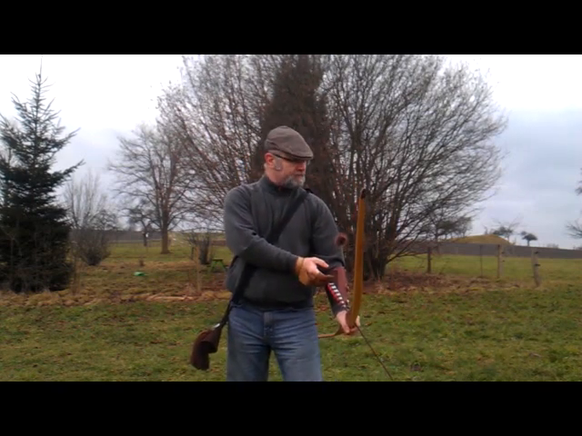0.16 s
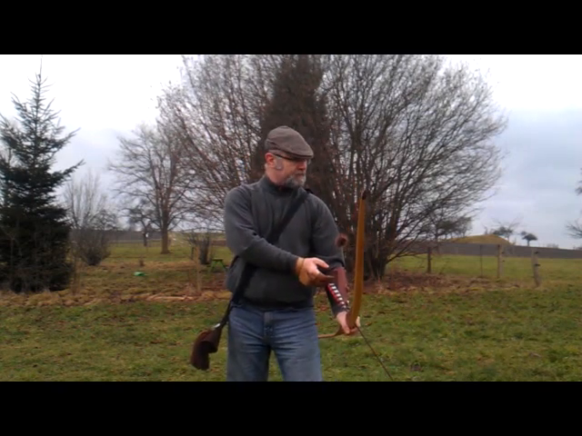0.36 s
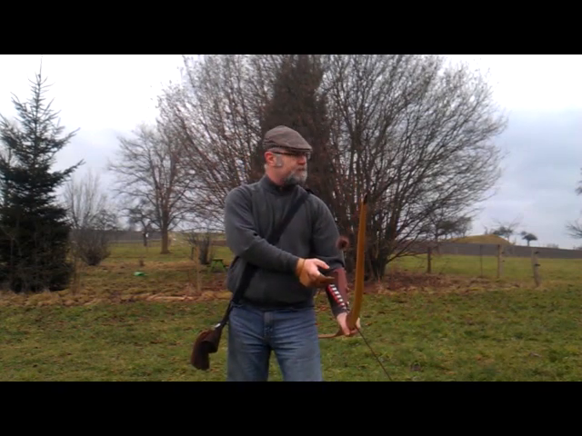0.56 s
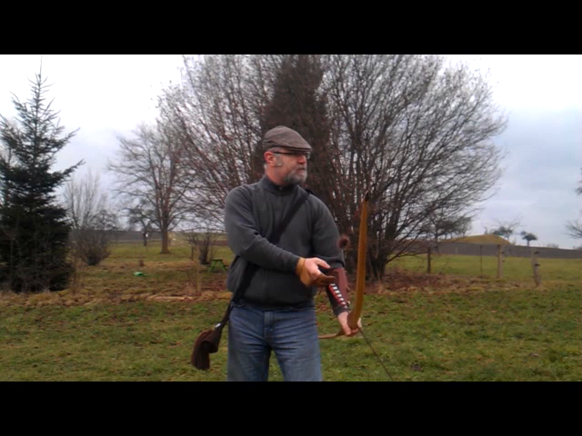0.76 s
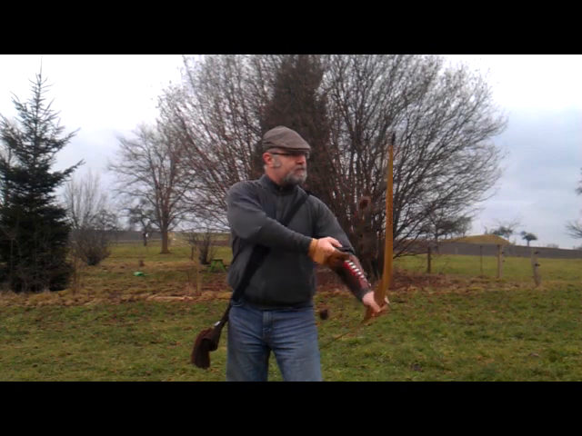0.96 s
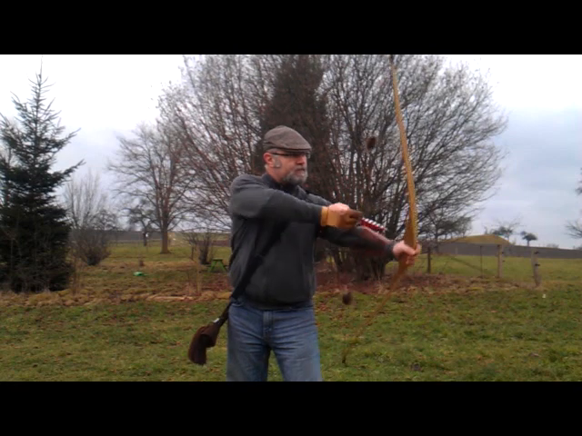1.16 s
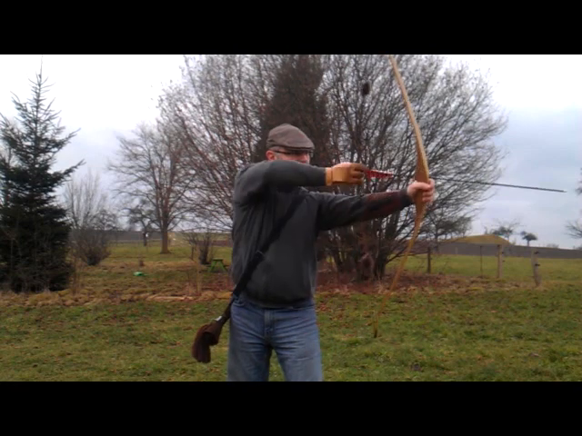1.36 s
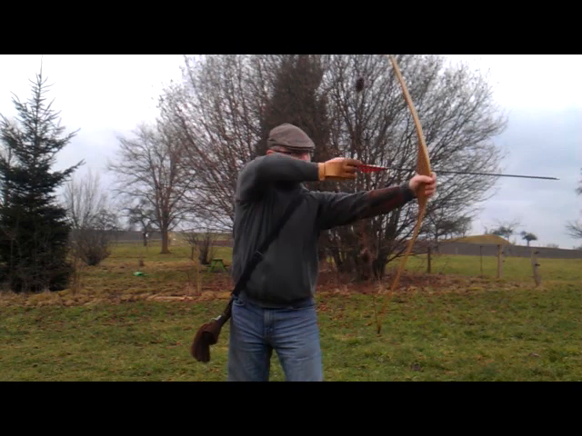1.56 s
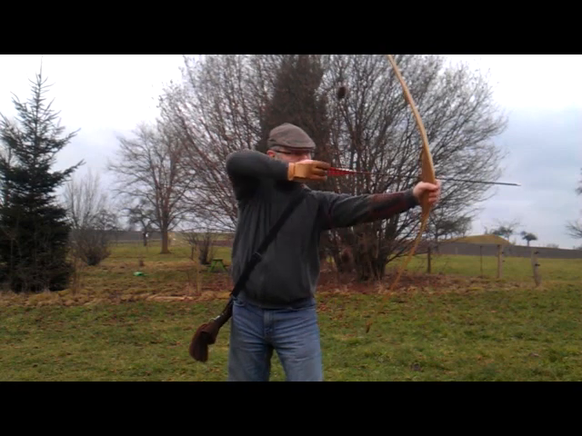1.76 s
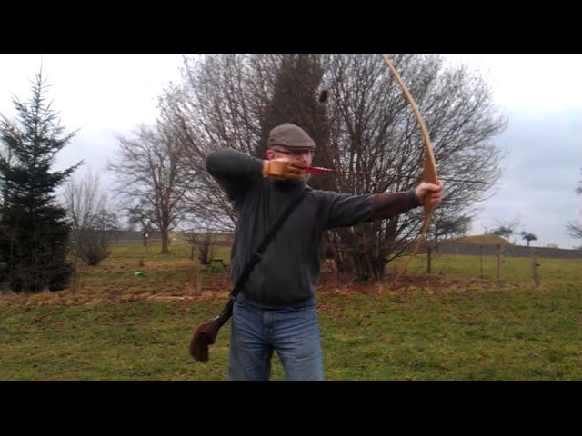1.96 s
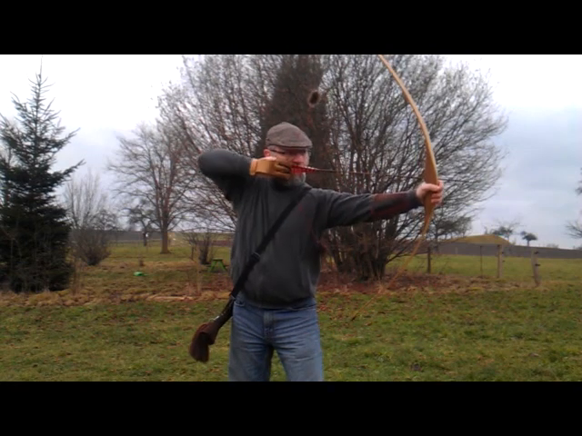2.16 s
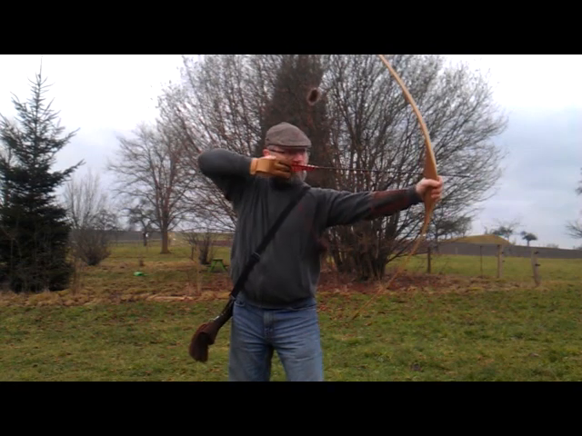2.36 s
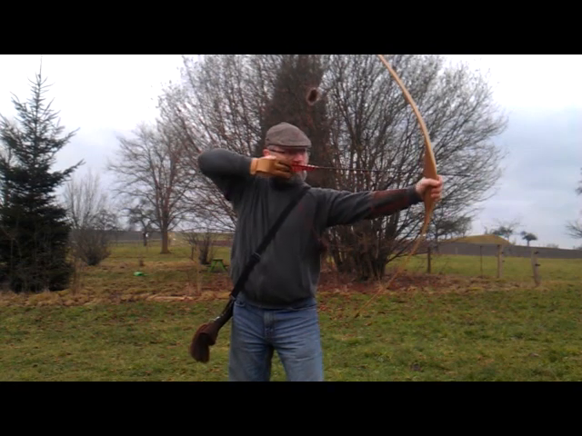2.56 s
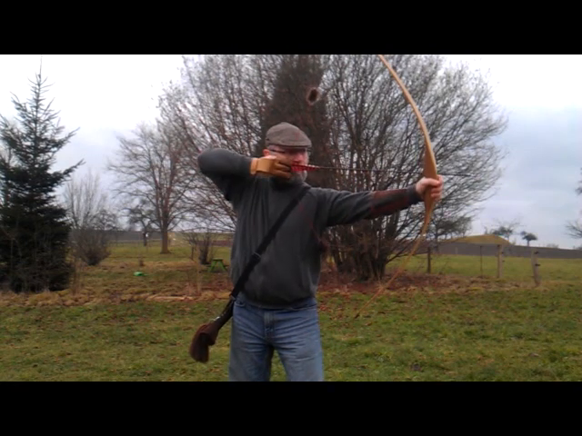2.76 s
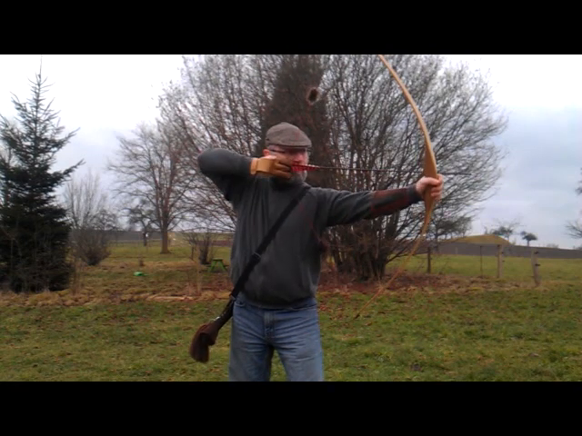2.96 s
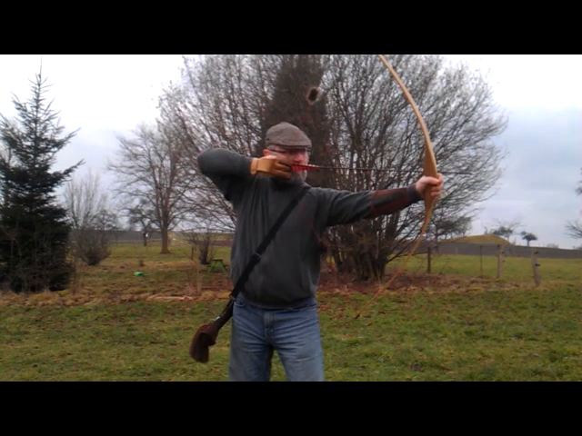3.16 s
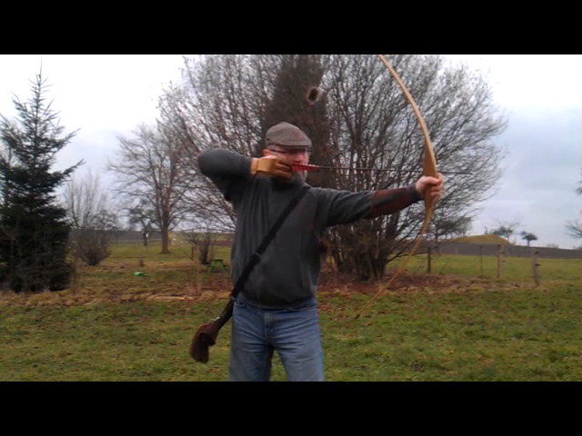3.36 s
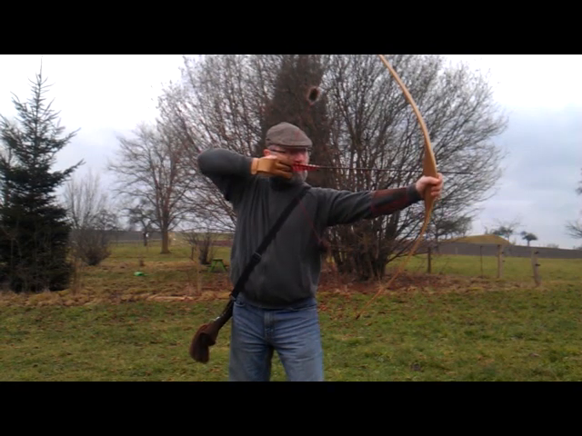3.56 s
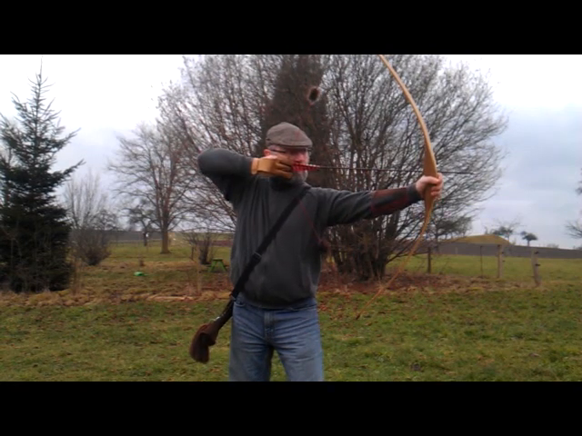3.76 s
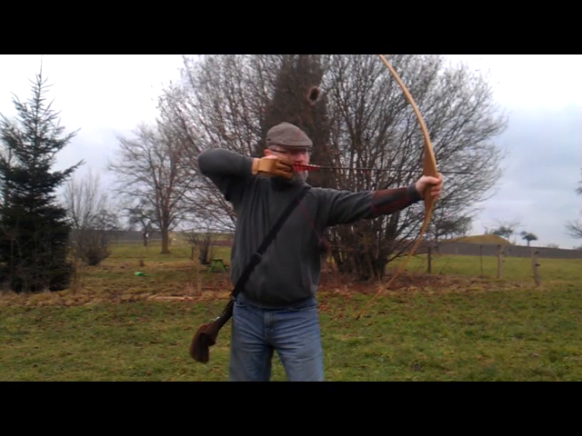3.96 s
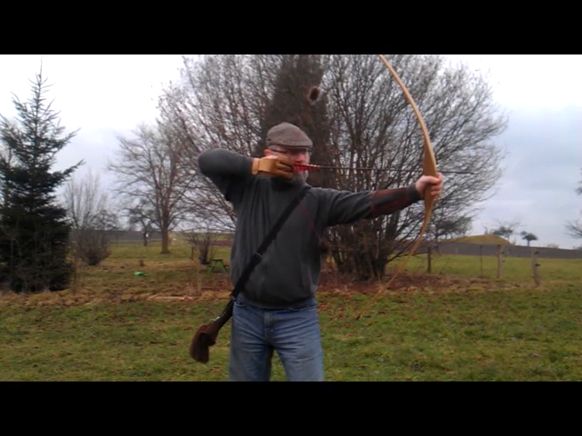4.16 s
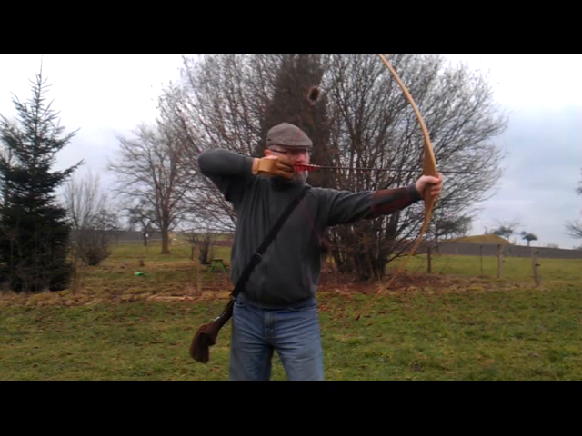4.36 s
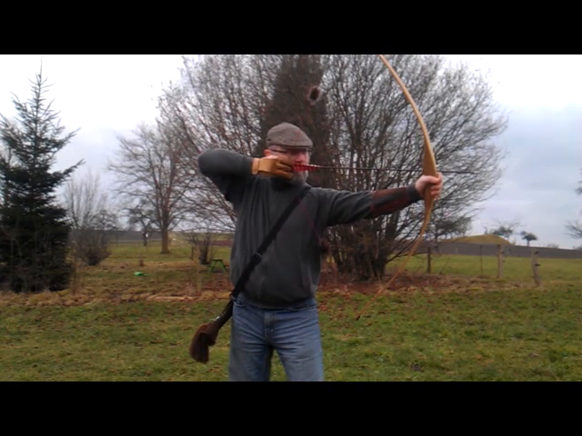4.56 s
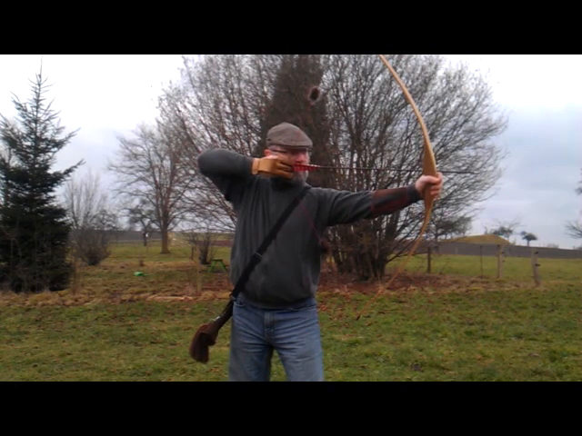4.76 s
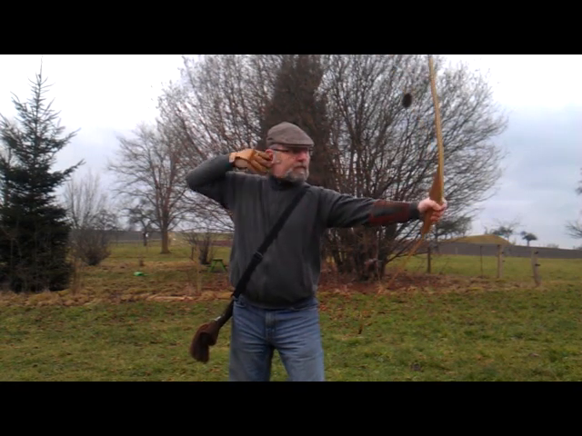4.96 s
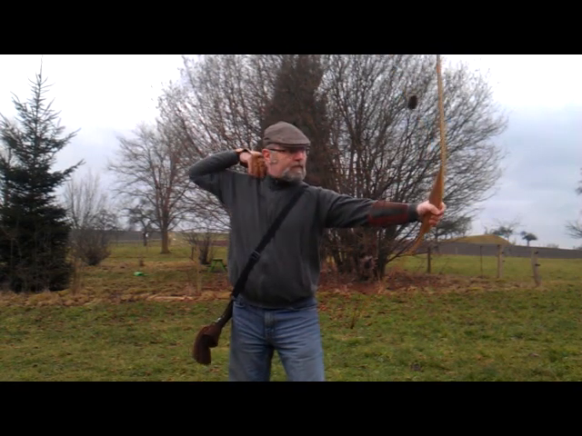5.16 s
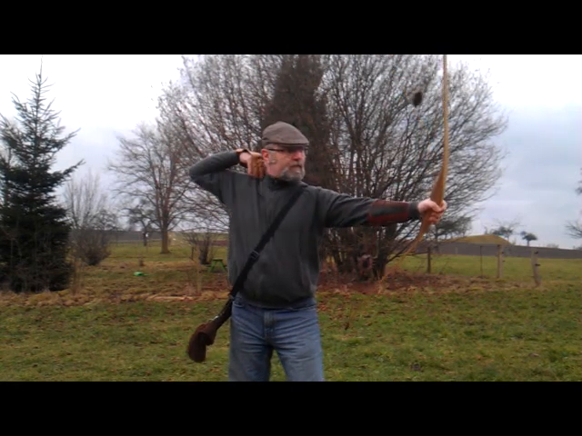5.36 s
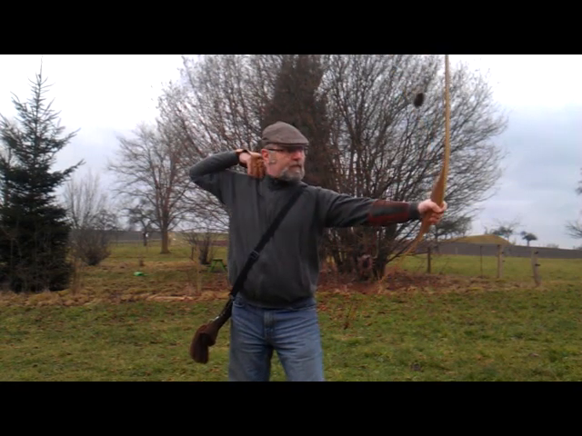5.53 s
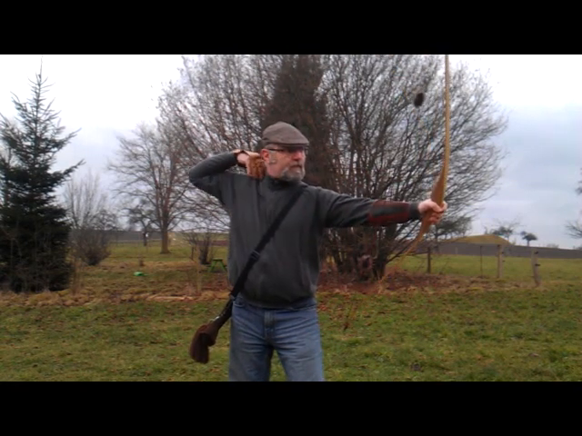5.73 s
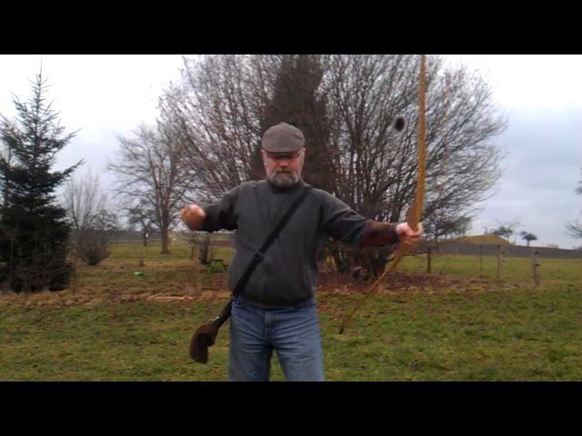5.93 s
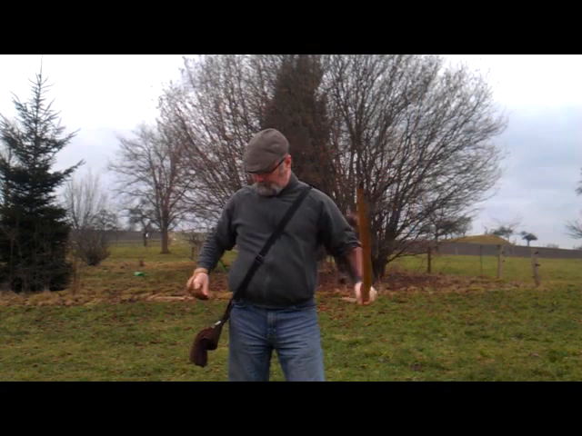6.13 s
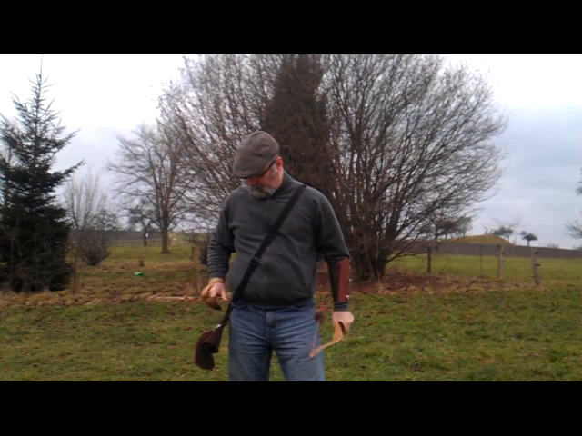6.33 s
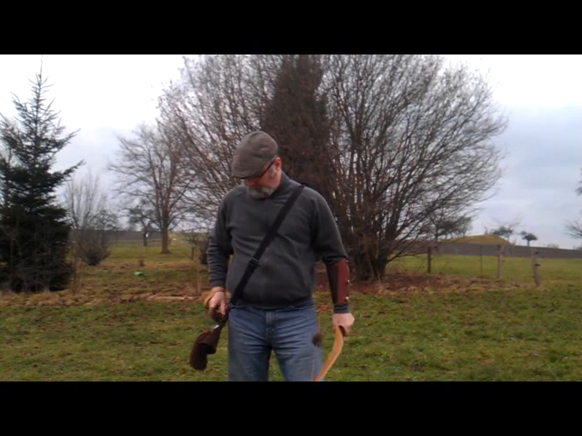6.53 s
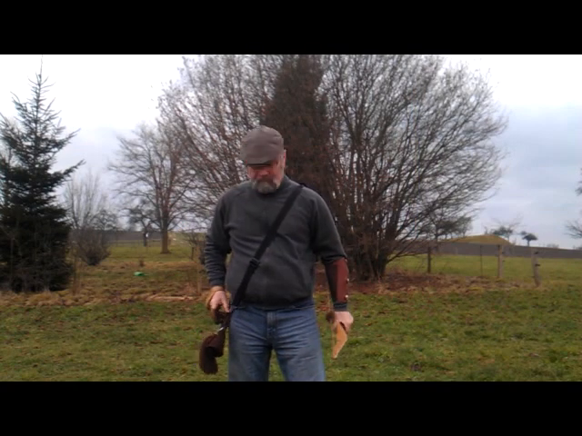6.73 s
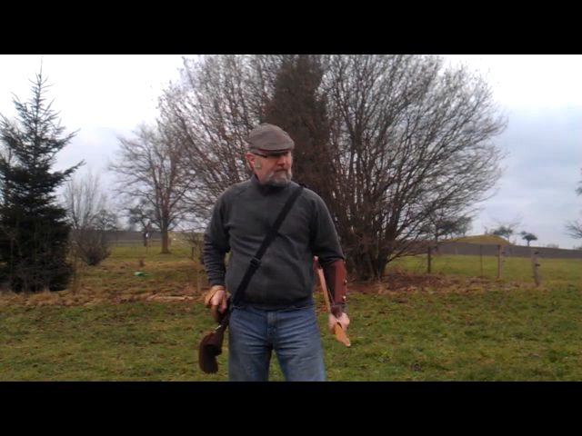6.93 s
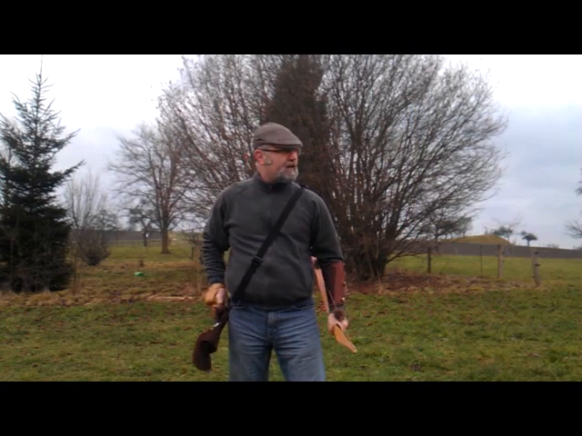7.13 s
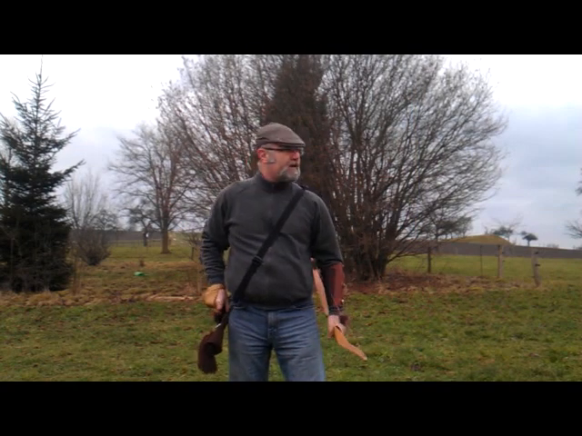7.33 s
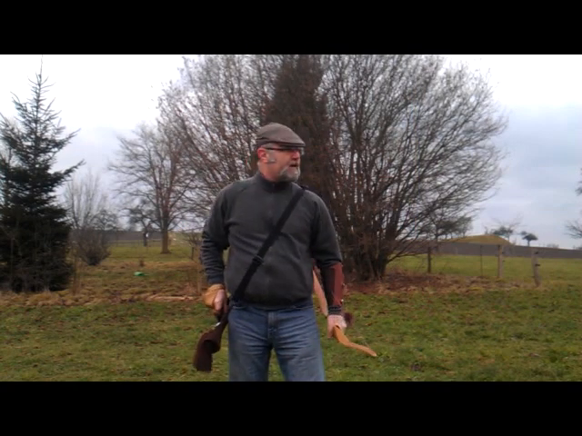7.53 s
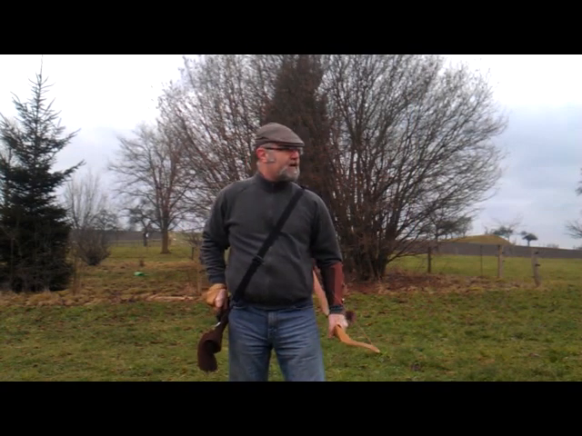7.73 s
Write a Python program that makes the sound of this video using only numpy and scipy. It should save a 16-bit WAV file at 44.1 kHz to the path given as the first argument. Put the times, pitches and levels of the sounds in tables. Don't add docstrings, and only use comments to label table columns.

```python
import sys
import numpy as np
from scipy import signal
from scipy.io import wavfile
from scipy.ndimage import uniform_filter1d

SR = 44100
rng = np.random.default_rng(int(sys.argv[2]) if len(sys.argv) > 2 else 0)


def pcm_store(signal):
    levels = np.round(np.clip(np.atleast_2d(signal), -1, 1) * 32767)
    wavfile.write(sys.argv[1], SR, levels.astype(np.int16).T)


def gain_from_db(level_db):
    decades = np.asarray(level_db, float) / 20
    return 10 ** decades


N = 348257

# [t/s, level/dB, f/Hz]
STRING_ZIP = [(4.8425, -47, 1897), (4.8455, -38, 2500), (4.8478, -23.5, 3050), (4.8503, -21, 3170),
              (4.8512, -39, 3050), (4.8533, -27, 2950), (4.855, -42, 2900)]
# [t/s, wood level/dB, dry crack level/dB, pitch factor of the wood]
STRING_SLAPS = [(4.8362, -36, -42, 1.1), (4.8505, -10, -18, 1.0), (4.8542, -20, -12, 1.05),
                (4.8575, -21, -30, .95), (4.8622, -15, -9.5, .95), (4.8657, -8.5, -32, 1.0),
                (4.8692, -19, -30, .97), (4.8725, -24, -32, .95), (4.8745, -25, -38, .85),
                (4.879, -30, -50, .8), (4.9091, -26, -35, 1.1), (4.9135, -39, -44, 1.1)]
# [f/Hz, level/dB, time to fall 60 dB/s]
LIMB_MODES = [(422, -27.5, 0.042), (605, -22.5, 0.03), (760, -29, 0.03), (810, -20, 0.018),
              (1166, 4.5, 0.0045), (1150, -26, 0.023), (1920, -20, 0.012), (195, -21, 0.043),
              (130, -24, .05)]
# [f/Hz, level/dB, time to fall 60 dB/s]
STAVE_MODES = [(458, -32, 0.066), (542, -31, 0.13), (686, -42, 0.25), (716, -40, 0.07), (775, -43, 0.22),
               (1024, -23, .055), (1166, -21, .04), (265, -28, 0.06)]
# [t/s, level/dB, push or rebound]
POINT_JOLTS = [
    (5.136, -6.5, 1),
    (5.1363, -6.5, 0.93),
    (5.1367, -8, -0.85),
    (5.137, -3, -0.95),
]
# [f/Hz, level/dB, time to fall 60 dB/s]
FACE_MODES = [(2300, -8, 0.0032), (3910, -8, 0.0046), (4800, -8, 0.0064), (7720, -8.5, 0.008),
              (9370, -17, 0.0048), (6150, -18, 0.0046)]
# [t/s, level/dB]
SHAFT_KNOCKS = [
    (5.13595, -5),
    (5.1365, 0),
]
# [f/Hz, level/dB, time to fall 60 dB/s]
KNOCK_MODES = [(1860, -5, 0.0053), (1040, -9.5, 0.0054)]
# [f/Hz, level/dB, time to fall 60 dB/s]
STAND_MODES = [(152, -18.5, .036)]
# [f/Hz, level/dB, time to fall 60 dB/s]
STRAW_MODES = [(236, -21, 0.027), (335, -26, 0.045), (440, -20, 0.022), (570, -25, .032), (720, -36, 0.03)]
# [t/s, level/dB, time to fall 60 dB/s, lowest
# f/Hz, highest f/Hz]
HISSES = [(4.8375, -36.5, 0.18, 900, 11000), (4.836, -41, .05, 200, 1400), (7.0645, -51, .012, 900, 4500),
          (4.8508, -20.5, 0.033, 4900, 13000), (4.8543, -25.5, 0.08, 5800, 9100),
          (4.867, -33.5, 0.036, 3960, 9600), (4.881, -56, 0.5, 6600, 8900), (4.853, -26, 0.081, 252, 1500),
          (4.853, -31, .075, 1500, 5500), (5.1367, -16.5, 0.013, 840, 9300), (5.14, -38, 0.05, 2300, 6000),
          (5.14, -36, .06, 6300, 9500), (5.1475, -36, .03, 6500, 7800), (5.165, -53, .04, 6600, 7600),
          (5.148, -42, 0.038, 1200, 9400), (5.216, -60, .15, 1450, 2300)]
# [delay t/s, level/dB, time to fall 60 dB/s]
TREE_ECHOES = [
    (.003, -68, 0.084),
    (.066, -57, 0.5),
    (.145, -62, .2),
    (.2, -65, 0.57),
]

# [t/s, level/dB, swell/s, fade/s]
SLEEVE_RUSTLES = [
    (.05, -53.5, 0.14, 0.18),
    (.982, -61, .095, 0.036),
    (6.068, -66.5, 0.49, 0.24),
    (7.438, -59, 0.22, 0.057),
]
# [f/Hz, level/dB per Hz]
CLOTH_COLOUR = [(880, -46), (1500, -5.5), (2670, -7.5), (4480, 0), (8810, -5), (12400, -16), (13000, -34)]
# [t/s, level/dB]
DRAW_LEVEL = [
    (1.45, -89),
    (1.584, -55.5),
    (2.086, -54),
    (2.2, -75),
]
# [f/Hz, level/dB per Hz]
SHAFT_COLOUR = [(1180, -44), (2000, -12), (2430, -13), (4920, -4), (5280, -9), (5800, -5.5), (7750, 0.5),
                (11900, -19), (12700, -23), (13000, -38)]
# [t/s, level/dB, lowest f/Hz, highest f/Hz]
GEAR_TICKS = [(5.2833, -41, 4200, 7400), (7.0645, -47, 6300, 8450), (7.234, -46.5, 6300, 8450),
              (7.4084, -55, 6300, 8450), (7.416, -40, 6300, 8450), (7.4322, -33, 6300, 9500),
              (7.444, -41, 6800, 9500), (7.5463, -43, 6300, 8450), (1.712, -48, 3000, 9000),
              (5.2075, -53, 3600, 8000), (5.2122, -48, 3800, 4800), (5.229, -47, 6200, 8500),
              (5.214, -48, 6300, 7400), (5.264, -49, 5500, 8500)]

# [t into the call/s, f/Hz, level/dB]
CHIRRUP_PATH = [(0, 3900, 3), (.006, 4900, 4), (.014, 5550, 3.5), (.026, 5250, 1), (.032, 4500, -2),
                (.04, 4550, -1), (.046, 3150, -7), (.058, 4250, -2), (.07, 3650, -2), (.112, 2700, -8)]
# [t/s, level/dB, pitch factor]
CHIRRUP_CALLS = [(4.312, -58, 0.99), (5.323, -56.5, 1.0), (6.256, -58.5, 1.0), (7.459, -57.5, 0.99)]
# [t into the call/s, f/Hz, level/dB]
EARLY_PATH = [(0, 4600, 2), (.01, 5400, 4), (.027, 5450, 3), (.031, 4700, -1), (.04, 4850, -1),
              (.046, 3500, -16), (.056, 4200, -5), (.08, 3500, -3), (.11, 2950, -9)]
# [t/s, level/dB, pitch factor]
EARLY_CALLS = [(1.296, -63, 0.98), (2.257, -60.5, 0.99)]
# [t into the call/s, f/Hz, level/dB]
CHIRP_PATH = [(0, 3500, -6), (.007, 3750, 5), (.014, 4050, -6), (.022, 3750, -1), (.032, 3400, -13),
              (.042, 2850, -1), (.056, 3650, -3), (.066, 3105, -6), (.1, 2920, -8)]
# [t/s, level/dB, pitch factor]
CHIRP_CALLS = [(2.868, -58.5, 1.04), (3.774, -67, 1.06), (7.053, -57, 1.0)]
# [t into the call/s, f/Hz, level/dB]
DOUBLE_PATH = [(0, 4300, -6), (.01, 5300, 3), (.018, 5500, 0), (.03, 4900, -7), (.045, 3750, -3),
               (.062, 3650, -15), (.078, 4300, 2), (.1, 3500, -2)]
# [t/s, level/dB, pitch factor]
DOUBLE_CALLS = [(.548, -69.5, 0.99), (3.345, -68, 0.96), (5.665, -68.5, 1.02), (6.024, -65, 1.0)]
# [t into the call/s, f/Hz, level/dB]
WANDER_PATH = [(0, 3500, 0), (.022, 2750, -3), (.036, 3700, -3), (.048, 4150, 3), (.066, 3850, 4),
               (.076, 3500, 2)]
# [t/s, level/dB, pitch factor]
WANDER_CALLS = [(5.212, -67, 1.0)]
# [t into the tone/s, f/Hz, level/dB]
LOW_TONE_PATH = [(0, 1800, 4), (.008, 2200, 4), (.02, 1850, 0), (.04, 1600, -1), (.056, 1950, 0),
                 (.064, 1800, -2)]
# [t/s, level/dB, pitch factor]
LOW_TONE_TIMES = [(5.208, -68, 1.0)]
# [t/s, level/dB, f/Hz]
THIN_WHISTLE = [(5.533, -70, 7850), (5.535, -54, 8050), (5.56, -54.5, 8180), (5.6, -50, 8220),
                (5.64, -59, 8080), (5.665, -51.5, 8130), (5.682, -59, 7800), (5.687, -80, 7600)]
# [t/s, number of bursts, spacing/s, level/dB]
SCOLDING = (3.899, 5, .083, -60)
# [share per s of length at the start, at the end]
ARCH_BEND = (-5.5, -5.5)
LEVEL_BEND = (0.33, -0.74)
DIP_BEND = (3.9, 4.5)
RISE_BEND = (-7.0, 7.6)
GLIDE_BEND = (-3.5, 4.5)
SOAR_BEND = (-13, 9.0)
FALL_BEND = (3.95, -5)
# [t/s, length/s, middle f/Hz, level/dB]
ARCH_NOTES = [(.625, 0.021, 5160, -75), (1.178, 0.083, 4340, -63), (7.352, .045, 5350, -68),
              (1.186, 0.086, 7600, -74), (1.205, .033, 5460, -69), (2.476, .05, 8400, -74),
              (4.292, 0.032, 4100, -67), (6.975, .026, 5500, -68), (7.048, .025, 5550, -70),
              (1.695, .045, 5300, -66), (1.82, 0.078, 5470, -57), (1.95, 0.038, 4760, -62),
              (2.304, .03, 3950, -78), (2.519, 0.022, 5760, -63.5), (3.402, 0.036, 4720, -68),
              (3.493, .025, 4030, -68.5), (3.81, 0.031, 4610, -68), (3.852, .025, 4380, -65.5),
              (5.168, 0.034, 5480, -68), (5.731, 0.048, 5370, -71), (6.796, 0.04, 4130, -64),
              (6.819, 0.061, 5720, -58.5), (6.87, .025, 3900, -65), (6.931, 0.045, 4510, -63),
              (7.08, .03, 4850, -63), (7.132, .02, 5000, -69), (7.158, 0.034, 5100, -69)]
LEVEL_NOTES = [(1.065, .03, 5600, -72), (1.11, .045, 3750, -74), (1.318, 0.023, 2350, -69),
               (6.964, .016, 1550, -63.5), (7.0565, .009, 3800, -57), (7.074, .01, 3750, -57),
               (6.487, .013, 4550, -69), (6.41, .012, 4850, -71), (1.71, .014, 2750, -66),
               (1.562, .016, 2950, -69), (1.585, .025, 6150, -67), (2.888, .012, 5400, -67),
               (1.644, .05, 5600, -70), (2.235, 0.039, 5850, -74), (2.36, .045, 5450, -69.5),
               (2.482, 0.026, 4160, -59.5), (2.855, 0.054, 5050, -64), (2.877, .026, 5400, -63),
               (3.692, 0.073, 5310, -62), (3.868, .03, 5350, -64.5), (4.515, .05, 5200, -71),
               (7.0, .026, 5150, -70), (3.77, .05, 5350, -71)]
DIP_NOTES = [(2.396, 0.027, 3720, -67), (2.444, .031, 5100, -69), (6.628, .03, 4950, -70),
             (6.555, .032, 4950, -71), (3.36, 0.037, 4000, -71), (3.899, 0.027, 3700, -63),
             (4.445, 0.0316, 5100, -64), (4.477, 0.059, 3580, -59.5), (4.205, .016, 3750, -70),
             (4.328, .017, 2960, -63), (5.347, 0.026, 2900, -62), (5.333, .014, 3400, -66)]
RISE_NOTES = [(1.055, .016, 4270, -73), (1.525, 0.016, 3980, -65), (3.945, .014, 4000, -62),
              (1.17, .025, 4900, -68), (2.462, .016, 5300, -66), (3.683, .012, 4700, -64),
              (4.433, .014, 4200, -61), (5.313, .014, 3400, -64), (5.308, .014, 6200, -69),
              (6.24, .012, 5900, -72), (1.755, .012, 3850, -65), (1.782, .018, 4000, -68),
              (6.39, .008, 4700, -68)]
GLIDE_NOTES = [(1.56, .025, 4900, -71), (6.645, .015, 4200, -72), (1.495, .03, 4900, -77),
               (2.436, .026, 3900, -68), (2.553, .017, 3700, -70), (4.25, .022, 6700, -69),
               (3.315, .02, 4400, -76), (6.462, .028, 3600, -70), (7.008, .048, 4850, -67),
               (7.268, 0.019, 5350, -75)]
SOAR_NOTES = [(1.172, .028, 5900, -74), (2.537, .022, 6000, -69), (2.841, 0.012, 4400, -66),
              (2.93, 0.015, 4250, -62)]
FALL_NOTES = [(1.535, 0.026, 3800, -70), (1.655, .025, 4500, -70), (2.506, .013, 3850, -65),
              (2.572, .02, 6200, -79), (2.946, 0.021, 4400, -67), (3.972, 0.021, 2800, -69),
              (1.215, 0.057, 3690, -62.5), (3.8, 0.036, 3350, -67), (4.537, 0.016, 3830, -61),
              (5.381, 0.037, 3110, -67), (7.398, 0.013, 4400, -76), (3.737, .022, 5350, -61),
              (2.9, .02, 4000, -68), (2.94, .03, 3400, -66), (2.528, .012, 5300, -66),
              (6.422, .014, 4500, -70), (1.23, .04, 3900, -69)]

# [t/s, level/dB]
GUST_LEVEL = [(0.0, -66), (1.91, -67), (1.98, -57.5), (3.05, -68), (3.45, -65), (3.85, -52.5),
              (4.46, -57.5), (4.72, -58), (4.95, -59), (5.21, -60), (5.39, -51), (5.54, -61), (5.85, -53),
              (6.0, -52), (6.1, -65), (6.9, -61), (7.4, -54.5), (7.5, -59), (7.9, -50.5)]
# [f/Hz, level/dB per Hz]
BUFFET_COLOUR = [(7.1, -20), (12, -5.5), (38, 3.5), (72, -0.5), (142, -10.5), (198, -17.5), (260, -50),
                 (340, -47), (570, -120)]
# [t/s, level/dB, length/s, push or pull]
EDDY_BUMPS = [(2.045, -42.5, .03, 1), (3.664, -52, .025, 1), (3.786, -39.5, .025, 1), (4.17, -46, .025, -1),
              (4.294, -45, 0.022, 1), (4.542, -50, 0.013, -1), (4.570, -42, .02, 1), (4.616, -45, .027, 1),
              (4.692, -46, 0.027, -1), (4.713, -45, 0.019, 1), (4.723, -40, .027, -1.1),
              (4.756, -48, 0.018, -1), (4.78, -44, 0.035, 1), (5.088, -46, 0.022, 1),
              (5.825, -41.5, .025, 1), (7.075, -45.5, 0.036, 1), (7.307, -47.5, 0.023, 1),
              (7.415, -40.5, 0.036, 1)]
# [f/Hz, level/dB per Hz]
FIELD_COLOUR = [(25, -14), (55, 2.5), (95, -9), (140, -4.5), (460, -8.5), (560, -5.5), (952, -6),
                (2010, -14.5), (3650, -15.5), (4090, -14), (4920, -18.5), (7430, -16.5), (11800, -20.5),
                (13000, -24.5)]
# [t/s, level/dB]
ROAD_SWELL = [
    (0.0, -64),
    (0.37, -66),
    (5.28, -64),
    (6.13, -65),
    (7.9, -62.5),
]
# [t/s, level/dB, firing f/Hz]
MOTOR_PASS = [
    (2.7, -92, 194),
    (3.0, -74, 192),
    (3.5, -76, 194.2),
    (3.8, -78, 195),
    (4.1, -92, 190),
]
# [multiple of firing f, level/dB]
MOTOR_OVERTONES = [(3, -13), (4, 2), (5, 2.5), (6, -2.5)]


def release():
    out = whistle(STRING_ZIP)
    add(out, 4.863, ring(STAVE_MODES, soft=0.0043))
    # f/Hz, level/dB, time to fall 60 dB/s
    crack_modes = [(2540, -1.5, 0.0011), (4900, -4.0, 0.0016), (7800, -1.0, 0.0023), (11600, -11.0, 0.0029)]
    for s, wood_db, crack_db, factor in STRING_SLAPS:
        add(out, s, -gain_from_db(wood_db) * ring(LIMB_MODES, factor, soft=0.00035))
        add(out, s, gain_from_db(crack_db) * ring(crack_modes))
    return out


def impact():
    out = np.zeros(N)
    factors = rng.uniform(0.96, 1.02, len(POINT_JOLTS))
    for (s, db, sense), factor in zip(POINT_JOLTS, factors):
        add(out, s, sense * gain_from_db(db) * ring(FACE_MODES, factor))
    for s, db in SHAFT_KNOCKS:
        add(out, s, gain_from_db(db) * ring(KNOCK_MODES, soft=0.00039))
    out = out + gain_from_db(-24) * np.roll(out, round(.011 * SR))
    add(out, 5.1358, -ring(STAND_MODES, soft=0.0023))
    add(out, 5.1386, -sum(ring([mode], soft=0.00051) for mode in STRAW_MODES))
    return out


def hisses():
    out = np.zeros(N)
    t = np.arange(round(.4 * SR)) / SR
    for s, db, t60, low_hz, high_hz in HISSES:
        rise = .04 * t60
        shape_db = np.where(t < rise, 18 * (t / rise - 1), -60 * (t - rise) / t60)
        hiss = band(rng.standard_normal(len(t)), low_hz, high_hz)
        hiss = evened(band(hiss, low_hz, high_hz))
        add(out, s - rise, gain_from_db(db + shape_db) * hiss)
    return out


def echoes(cracks):
    tail = np.zeros(SR)
    t = np.arange(SR // 2) / SR
    for delay, db, t60 in TREE_ECHOES:
        envelope = gain_from_db(db - 60 * t / t60) * np.minimum(t / .006, 1)
        spray = rng.uniform(-2, 2, len(t)) * (rng.random(len(t)) < .5)
        add(tail, delay, envelope * spray)
    shaken = np.tanh(1 + evened(uniform_filter1d(rng.standard_normal(N), 25))) * 1.6
    bright = band(band(cracks, 1500, 10000), 2300, 11000)
    return shaken * signal.fftconvolve(bright, tail)[:N]


def archer():
    cloth = noise(CLOTH_COLOUR, patchy_db=2.0, size=256)
    out = draw_scrape()
    for s, db, swell, fade in SLEEVE_RUSTLES:
        out = out + gated([(s - swell, db - 14), (s, db), (s + fade, db - 13.5)], cloth)
    t = np.arange(600) / SR
    for s, db, low_hz, high_hz in GEAR_TICKS:
        tick = evened(band(rng.standard_normal(600), low_hz, high_hz))
        add(out, s, gain_from_db(db - 4.5 - 60 * t / 0.014) * tick)
    return out


def draw_scrape():
    slips = rng.standard_normal(320)
    comb_hz = 1268

    def travel(t):
        return 11.95 * (t - 2) - 11.0 * (t - 2) ** 2 + .05 * np.interp(40 * t, np.arange(320), slips)

    def comb_db(share, turns):
        return -20 * np.log10(abs(1 - share * np.exp(2j * np.pi * turns)))

    def ridges(hz, t):
        climbing = comb_db(.4, hz / comb_hz - travel(t) + 0.52)
        sinking = comb_db(.3, hz / comb_hz + travel(t) + 0.091)
        return climbing + sinking

    chatter = gain_from_db(1.5 * evened(uniform_filter1d(rng.standard_normal(N), size=90)))
    scrape = noise(SHAFT_COLOUR, patchy_db=2.0, size=512, ridges=ridges)
    return gated(DRAW_LEVEL, evened(chatter * scrape))


def birds():
    out = whistle(THIN_WHISTLE) + scolding() + single_notes()
    out = out + calls(CHIRRUP_PATH, CHIRRUP_CALLS, 0.0299, twin=True)
    out = out + calls(EARLY_PATH, EARLY_CALLS, .03, twin=True)
    out = out + calls(CHIRP_PATH, CHIRP_CALLS, .05)
    out = out + calls(DOUBLE_PATH, DOUBLE_CALLS, 1)
    out = out + calls(WANDER_PATH, WANDER_CALLS, 1)
    out = out + calls(LOW_TONE_PATH, LOW_TONE_TIMES, 0)
    t = np.arange(6000) / SR
    hedge = rng.standard_normal(6000) * (gain_from_db(-60 * t / .12) + gain_from_db(-13 - 60 * t / .6)) * (t > .002)
    hedge = hedge / np.linalg.norm(hedge)
    leaves = evened(1 + uniform_filter1d(rng.standard_normal(N), size=150) * 9)
    return out + gain_from_db(-8) * leaves * signal.oaconvolve(out, hedge)[:N]


def calls(path, rows, warble_from, twin=False):
    out = np.zeros(N)
    t = np.arange(0, path[-1][0], 1 / SR)
    hz, shape_db = (uniform_filter1d(c, size=110, mode="nearest") for c in curve(path, t))
    warble_depth = np.where(t > warble_from, .8, .2)
    twin_db = 5.5 - 4 + shape_db - 7 * np.clip((t - .03) / .005, 0, 1)
    for s, db, factor in rows:
        add(out, s, note(factor * hz, db + 6.5 + shape_db, warble_depth))
        if twin:
            add(out, s, note(factor * hz - 419, db + twin_db, warble_depth))
    return out


def single_notes():
    out = np.zeros(N)
    flock = rng.uniform([1, .02, 4200, -80], [N / SR, .05, 5700, -74], (70, 4))
    groups = [(ARCH_BEND, ARCH_NOTES), (LEVEL_BEND, LEVEL_NOTES), (DIP_BEND, DIP_NOTES),
              (RISE_BEND, RISE_NOTES), (GLIDE_BEND, GLIDE_NOTES), (SOAR_BEND, SOAR_NOTES),
              (FALL_BEND, FALL_NOTES), (ARCH_BEND, flock)]
    for bend, rows in groups:
        for s, length, middle_hz, db in rows:
            u = np.linspace(0, 1, round(length * SR))
            if bend is ARCH_BEND:
                u = .5 + .5 * np.sign(u - .5) * abs(2 * u - 1) ** 1.2
            ends = [1 + bend[0] * length, 1, 1 + bend[1] * length]
            hz = middle_hz * np.polyval(np.polyfit([0, .5, 1], ends, 2), u)
            add(out, s, note(hz, db + 6, 1 if bend is FALL_BEND else .2))
    return out


def note(hz, db, warble_depth):
    u = np.linspace(0, 1, len(hz))
    beat = 2 * np.pi * (125 * len(hz) / SR * u + rng.random())
    burr = evened(uniform_filter1d(rng.standard_normal(6000), 90))[:len(u)]
    burr_db = 2.6 * burr + 4 * warble_depth * np.cos(beat)
    turns = np.cumsum(hz + 110 * warble_depth * np.sin(beat)) / SR
    return gain_from_db(db + burr_db) * np.sin(2 * np.pi * turns) * abs(np.sin(np.pi * u)) ** 0.48


def scolding():
    out = np.zeros(N)
    start, bursts, spacing, db = SCOLDING
    for k in range(round(bursts)):
        turns = np.cumsum(np.linspace(3600, 5100, 2200)) / SR
        rasp = evened(band(rng.standard_normal(2200), 30, 840) * np.cos(2 * np.pi * turns))
        add(out, start + k * spacing, gain_from_db(db) * rasp * np.hanning(2200))
    return out


def wind():
    wander = uniform_filter1d(uniform_filter1d(rng.standard_normal(N), 1300), 1300)
    lumps = gain_from_db(3.5 * evened(wander))
    out = gated(GUST_LEVEL, evened(noise(BUFFET_COLOUR, patchy_db=2.5, size=4096) * lumps))
    for s, db, length, sense in EDDY_BUMPS:
        u = np.linspace(-3, 3, round(length * SR))
        add(out, s - length / 2, sense * gain_from_db(db) * (1 - 2 * u ** 2) * np.exp(-u ** 2))
    return out


def field():
    t = np.arange(N) / SR
    bed = gain_from_db(-60) * noise(FIELD_COLOUR, patchy_db=1.5, size=1024)
    swell_db = curve(ROAD_SWELL, t)[0]
    road = band(bed, 390, 4300) * (gain_from_db(swell_db - swell_db.mean()) - 1)
    turns = np.cumsum(curve(MOTOR_PASS, t)[1]) / SR
    motor = np.zeros(N)
    for multiple, db in MOTOR_OVERTONES:
        flutter = gain_from_db(5 * evened(uniform_filter1d(rng.standard_normal(N), 2000)))
        motor += gain_from_db(db) * flutter * np.sin(2 * np.pi * multiple * turns)
    return bed + road + gated(MOTOR_PASS, motor)


def evened(x):
    return x / np.sqrt(np.mean(x ** 2) + 1e-20)


def curve(rows, t):
    s, *columns = np.transpose(rows)
    return [np.interp(t, s, c) for c in columns]


def add(mix, s, sound):
    part = mix[round(s * SR):][:len(sound)]
    part += sound[:len(part)]


def band(x, low_hz, high_hz):
    sos = signal.butter(2, [low_hz, min(high_hz, SR / 2.2)], "band", fs=SR, output="sos")
    return signal.sosfilt(sos, x)


def gated(rows, x):
    t = np.arange(N) / SR
    return x * gain_from_db(curve(rows, t)[0]) * (t >= rows[0][0]) * (t <= rows[-1][0])


def whistle(rows):
    turns = np.cumsum(curve(rows, np.arange(N) / SR)[1]) / SR
    return gated(rows, np.sqrt(2) * np.sin(2 * np.pi * turns))


def ring(modes, factor=1, soft=.0001):
    t = np.arange(round(.2 * SR)) / SR
    sines = np.zeros(len(t))
    for k, (hz, db, t60) in enumerate(modes):
        sines += (-1) ** k * gain_from_db(db - 60 * t / t60) * np.sin(2 * np.pi * hz * factor * t)
    return sines * (1 - np.exp(-t / soft))


def noise(spectrum, patchy_db, size=512, ridges=None):
    frames = 4 * N // size + 5
    hz = np.fft.rfftfreq(size, 1 / SR)
    a, b, patches = rng.standard_normal((frames, len(hz), 3)).T
    patches = evened(uniform_filter1d(uniform_filter1d(patches, 6, 0), 10, 1))
    f, level = np.transpose(spectrum)
    db = np.interp(np.log(hz + 1), np.log(f + 1), level)[:, None] + patchy_db * patches
    if ridges:
        db = db + ridges(hz[:, None], np.arange(frames) * size / 4 / SR)
    sound = signal.istft((a + 1j * b) * gain_from_db(db), nperseg=size, noverlap=3 * size // 4)[1]
    return evened(sound[:N])


def scene():
    cracks = band(release() + impact() + hisses(), 90, 16000)
    return (cracks + echoes(cracks) + archer() + birds() + wind() + field())[None]


def low_pass(x):
    return signal.sosfilt(signal.butter(12, 13270, fs=SR, output="sos"), x)


def record(dry):
    edge = signal.firwin(511, 12700, window=("kaiser", 9), fs=SR)
    mix = signal.oaconvolve(dry, edge[None], "same")
    return low_pass(mix)


dry = scene()
out = record(dry)
pcm_store(out)
```